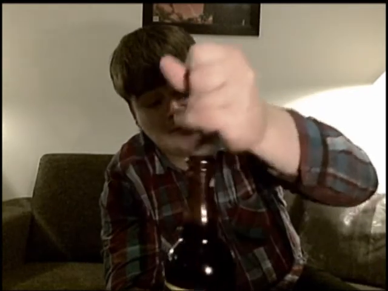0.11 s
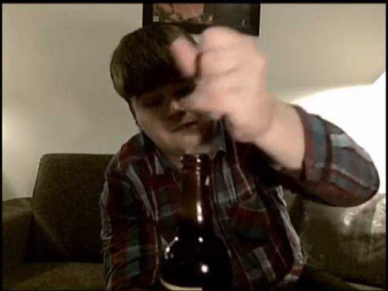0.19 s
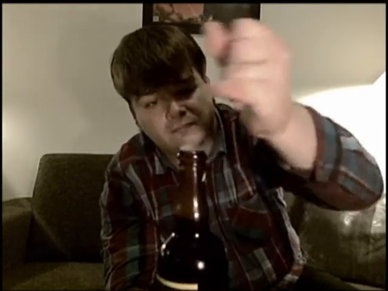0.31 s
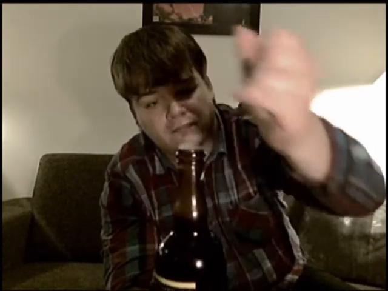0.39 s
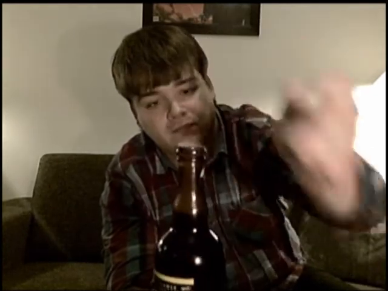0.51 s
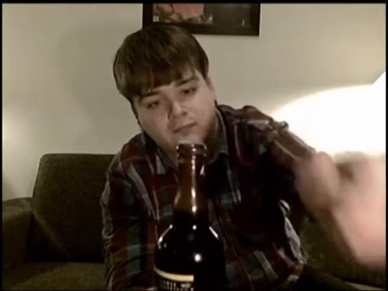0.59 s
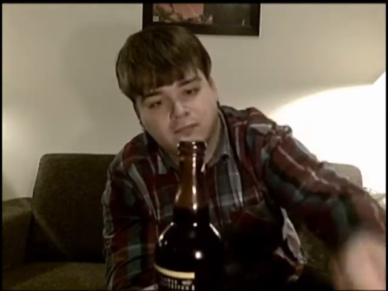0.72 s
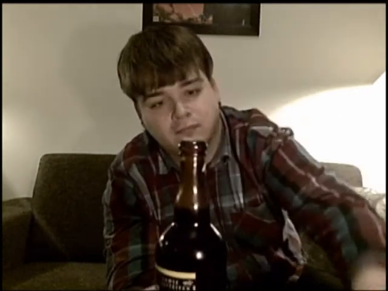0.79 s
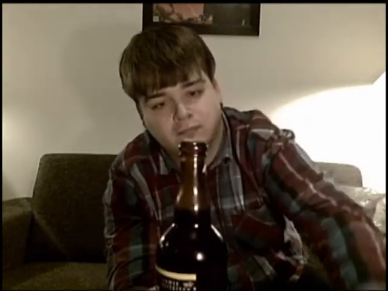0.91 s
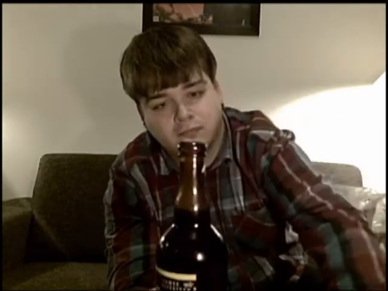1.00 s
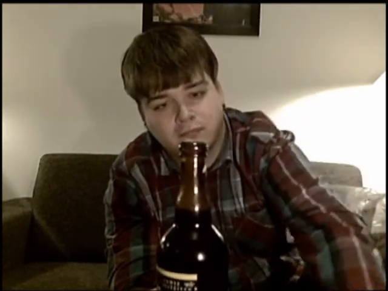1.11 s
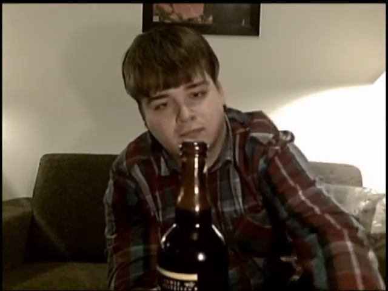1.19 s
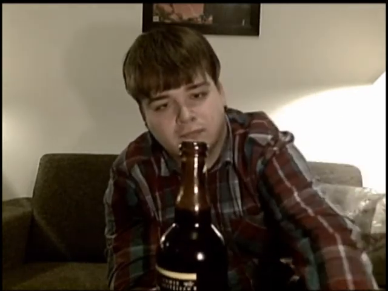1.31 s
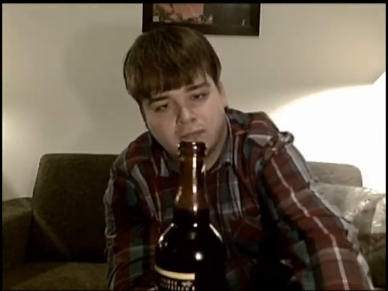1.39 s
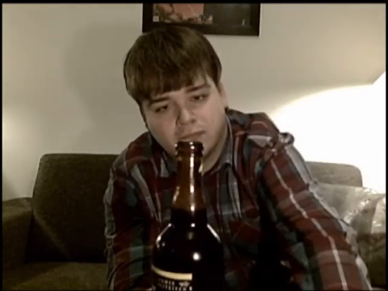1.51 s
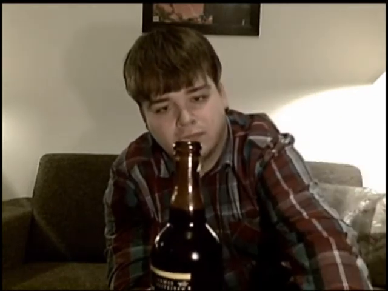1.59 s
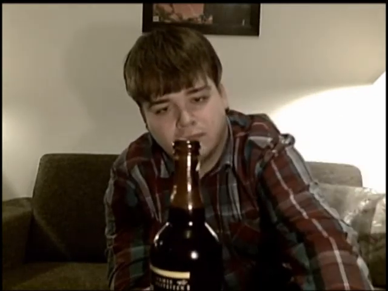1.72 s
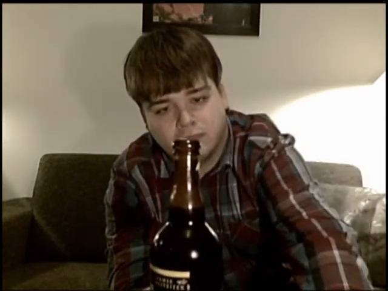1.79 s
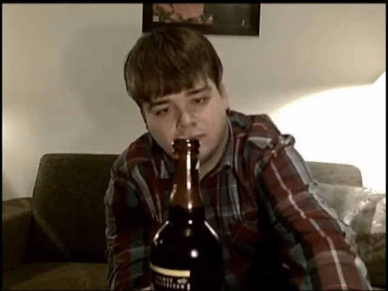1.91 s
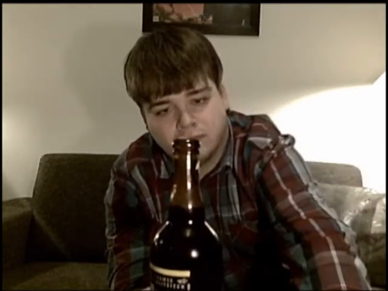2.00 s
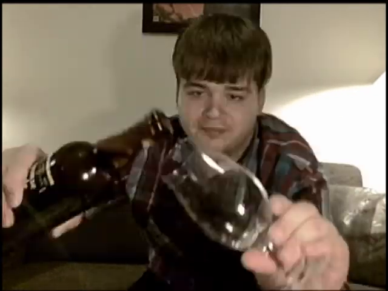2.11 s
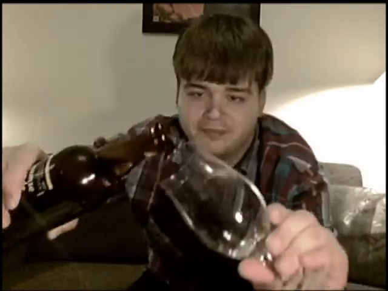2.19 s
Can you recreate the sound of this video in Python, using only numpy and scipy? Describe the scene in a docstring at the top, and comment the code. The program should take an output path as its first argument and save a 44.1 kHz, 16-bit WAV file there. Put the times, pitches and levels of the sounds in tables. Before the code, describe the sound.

A single loud cork pop from a glass bottle, close to a small microphone in a living room. Quiet hiss and faint wavering fan tones come first. At about 0.22 seconds the cork releases with a thump, airy snap and hollow mid-pitched neck note, clipping for roughly 0.06 seconds. Short echoes and a boxy room ring fade by about 0.7 seconds; then only hiss and fan remain.

```python
"""A cork comes free of a glass bottle close to a small microphone in a living room.
The suction lets go with a thump (damped sine) and a snap (decaying noise); the air in the neck rings
one hollow note (damped modes), which echoes, room modes and diffuse noise hold briefly.
The pop overloads the input for some 60 ms; around it are only noise hiss and the faint sines of a fan."""
import sys
import numpy as np
from scipy import signal
from scipy.fft import rfft, irfft
from scipy.io import wavfile

SR = 44100
rng = np.random.default_rng(int(sys.argv[2]) if len(sys.argv) > 2 else 0)


def wrap_up_sound(samples):
    """Save the sound to the file named by the first command line argument, as 16-bit audio."""
    columns = np.atleast_2d(samples).T
    # keep every value between -1 and 1, then stretch to whole-number steps
    tamed = np.clip(columns, -1, 1)
    steps = np.round(tamed * 32767).astype(np.int16)
    wavfile.write(sys.argv[1], SR, steps)


N = 97020

POP_S = .2230  # the cork clears the lip
DRAW_DB, DRAW_S = -17.5, .00077  # peak and time constant of the pressure dip
THUMP_HZ, THUMP_T60_S, THUMP_DB = 288, .012, 34  # level ahead of the mouth's low cut
SNAP_T60_S, SNAP_DB, SNAP_RISE_S = .06, -4, .002  # level ahead of the rise and decay
MOUTH_CUT_HZ, ECHO_CUT_HZ = 190, 290  # a small opening radiates little bass, furniture reflects even less
ROOM_DB = -1  # diffuse noise, ahead of build-up and decay
HISS_DB = -50  # rms ahead of the microphone
FAN_WANDER = .0027  # rms share of the speed
MIC_EDGE_HZ, TOP_HZ = 7910, 16500
CLIP_LEVEL, CLIP_KNEE = .97, 14  # ceiling; a higher knee exponent bends more sharply


def pop(age):
    """Superposition: the pressure dip, thump, snap and neck note of one release add linearly."""
    return suction_draw(age) + thump(age) + snap(age) + neck_note(age)


def suction_draw(age):
    """Rarefaction: the pressure sinks as the cork slides its last stretch, then recovers."""
    return -undb(DRAW_DB) * np.exp(-np.abs(age) / DRAW_S)


def thump(age):
    """Damped oscillation: the pressure swings as the suction lets go, its bass weakly radiated."""
    swing = ring(age, [(THUMP_HZ, THUMP_DB, THUMP_T60_S)])
    return low_cut(swing, MOUTH_CUT_HZ)


def snap(age):
    """Turbulence: air tearing past the cork makes broadband noise that rises fast and decays."""
    opening = np.clip(age / SNAP_RISE_S, 0, 1)
    tearing_air = noise([(500, 4.5), (2000, 6.5), (8000, -8.5)])
    return undb(SNAP_DB) * opening * fade(age, SNAP_T60_S) * tearing_air


def neck_note(age):
    """Cavity resonance: the air in the neck rings at its own modes."""
    # air modes of the neck: pitch_hz, level_db, t60_s
    neck_modes = [(578.3, 23.5, 0.054), (1689, -2, .11)]
    return ring(age, neck_modes)


def early_echoes(age, direct):
    """Specular reflection: nearby surfaces return delayed, weaker copies with less bass."""
    # reflections of the pop: delay_s, level_db
    paths = [(.0318, -19.5), (.0451, -20), (0.0922, -34.5)]
    reflected = low_cut(direct, ECHO_CUT_HZ)
    return sum(undb(db) * np.interp(age - delay, age, reflected) for delay, db in paths)


def room(age):
    """Reverberation: diffuse reflections and room modes build up, then decay exponentially."""
    # resonances that take up the neck's note: pitch_hz, level_db (ahead of build-up and decay), t60_s
    held_modes = [(604.05, 11.5, 0.24), (597.2, -5.5, 0.43), (707.3, -9, 0.34), (1175, -21, 0.36),
                  (184.2, -15.5, 0.36), (403.4, -16, 0.41)]
    held = sum(build_up(age, mode[0]) * ring(age, [mode]) for mode in held_modes)
    return undb(ROOM_DB) * diffuse_tail(age) + held


def diffuse_tail(age):
    """Statistical reverberation: each band of noise has its own build-up and decay; the lows stay."""
    # relative colour of the reverberation: frequency_hz, level_db (per Hz)
    tail_colour = [(30, -24.5), (65, -25), (100, -16), (160, 5), (300, -4), (450, 0), (560, 1.5), (700, -2),
                   (880, -15.5), (1300, -17.5), (1900, -12), (2800, -22.5), (3900, -17.5), (5000, -26.5),
                   (6300, -17.5), (7300, -24)]
    # reverberation time: frequency_hz, t60_s
    tail_t60 = [(50, .7), (150, 0.41), (550, 0.45), (1400, 0.3), (6000, 0.3)]
    hz = np.arange(N // 2 + 1) * SR / N
    spectrum = rfft(noise(tail_colour))
    edges = np.r_[0, np.geomspace(100, 8000, 10), SR]
    diffuse = 0
    for low, high in zip(edges, edges[1:]):
        centre = (low + high) / 2
        band = irfft(spectrum * ((hz >= low) & (hz < high)), N)
        diffuse = diffuse + band * build_up(age, centre) * fade(age, over_hz(tail_t60, centre))
    return diffuse


def build_up(age, hz):
    """Growth of the reverberant field: reflections accumulate smoothly from 0 to 1."""
    # time for the reflections to build up: frequency_hz, time_s
    build_times = [(150, 0.014), (600, .018), (3000, .012)]
    return 1 - np.exp(-(np.maximum(age, 0) / over_hz(build_times, hz)) ** 2)


def background():
    """Stationary noise: an even hiss lies under the tones of the fan."""
    # relative colour of hiss and fan air: frequency_hz, level_db (per Hz)
    hiss_colour = [(20, 1), (70, -4.5), (200, -6.5), (560, -5.5), (1000, -10.5), (1300, -9), (1650, -16.5),
                   (2400, -19), (4300, -20), (6300, -23), (7200, -30), (9000, -26.5)]
    return fan_tones() + undb(HISS_DB) * noise(hiss_colour)


def fan_tones():
    """Frequency modulation: a wavering speed shifts all tones of the fan in proportion."""
    # tones of a small fan: pitch_hz (at mean speed), level_db (rms)
    fan = [(247.6, -61.5), (742.9, -67.5), (1114, -62.5), (1674, -67.5), (2229, -75)]
    speed = 1 + FAN_WANDER * noise([(2, 0), (8, -6), (40, -60), (200, -140)])
    turn = 2 * np.pi * np.cumsum(speed) / SR  # phase of a 1 Hz tone
    tones = 0
    for hz, db in fan:
        start_phase = rng.uniform(0, 2 * np.pi)
        tones = tones + np.sqrt(2) * undb(db) * np.sin(hz * turn + start_phase)
    return tones


def ring(age, modes):
    """Modal superposition: (Hz, dB, t60 s) damped sines that start with a drop in pressure."""
    return sum(-undb(db) * fade(age, t60) * np.sin(2 * np.pi * hz * age) for hz, db, t60 in modes)


def fade(age, t60):
    """Exponential damping: from age 0 the amplitude falls 60 dB in t60 seconds."""
    return (age > 0) * np.exp(-np.log(1000) * np.maximum(age, 0) / t60)


def noise(colour):
    """Spectral shaping: white noise filtered to the given colour, at rms 1."""
    hz = np.arange(N // 2 + 1) * SR / N
    white = rfft(rng.standard_normal(N))
    x = irfft(white * undb(over_hz(colour, hz)), N)
    return x / np.std(x)


def low_cut(x, hz):
    """High-pass filtering: second order, 12 dB per octave below the edge."""
    return signal.sosfilt(signal.butter(2, hz, "highpass", fs=SR, output="sos"), x)


def over_hz(points, hz):
    """Logarithmic frequency scale: interpolate (Hz, value) points along it."""
    f, value = np.array(points, float).T
    return np.interp(np.log(np.maximum(hz, 1)), np.log(f), value)


def undb(db):
    """Level to amplitude: 20 dB is a factor of ten."""
    return 10 ** (np.asarray(db) / 20)


def scene():
    """Direct and reverberant field: one pop, its echoes and the tail of a quiet room."""
    age = np.arange(N) / SR - POP_S  # seconds since the release
    direct = pop(age)
    return (direct + early_echoes(age, direct) + room(age) + background())[None]


def record(dry):
    """Saturation: a narrow-band microphone feeds an input that clips flat; the top is cut."""
    x = signal.sosfilt(signal.butter(20, MIC_EDGE_HZ, fs=SR, output="sos"), dry)
    # clip at four times the rate to limit aliasing
    x = signal.resample_poly(x, 4, 1, axis=-1, window=("kaiser", 10))
    x = CLIP_LEVEL * x / (1 + np.abs(x) ** CLIP_KNEE) ** (1 / CLIP_KNEE)
    x = signal.resample_poly(x, 1, 4, axis=-1)
    return signal.sosfiltfilt(signal.ellip(8, .05, 50, TOP_HZ, fs=SR, output="sos"), x)


dry = scene()
out = record(dry)
wrap_up_sound(out)
```